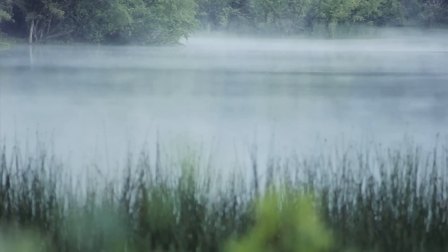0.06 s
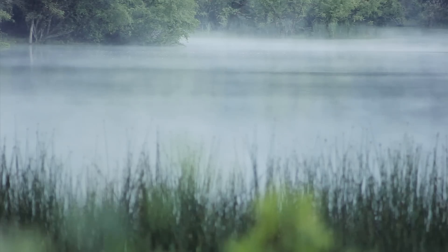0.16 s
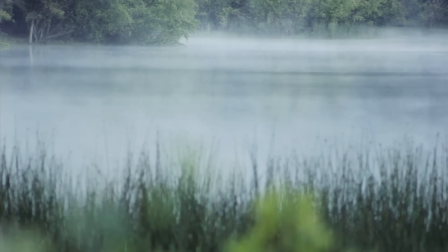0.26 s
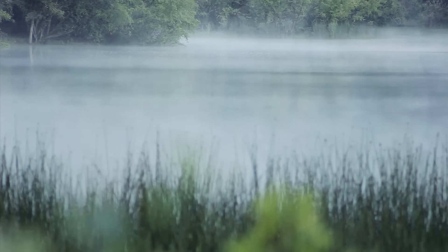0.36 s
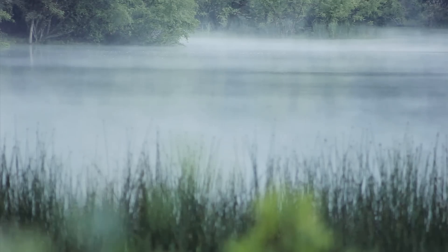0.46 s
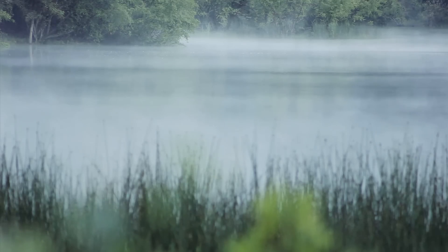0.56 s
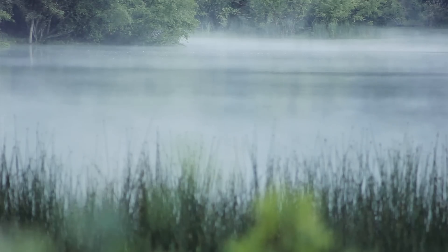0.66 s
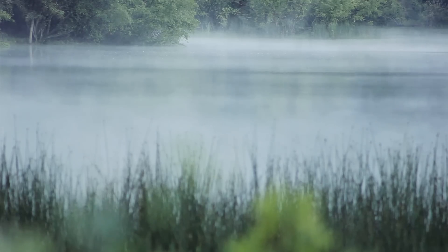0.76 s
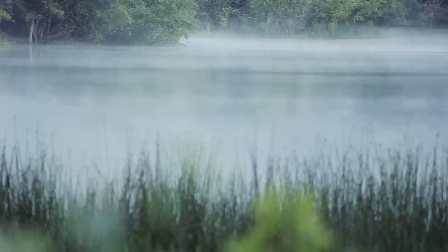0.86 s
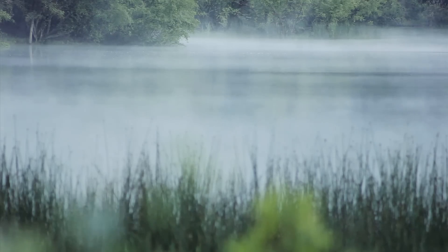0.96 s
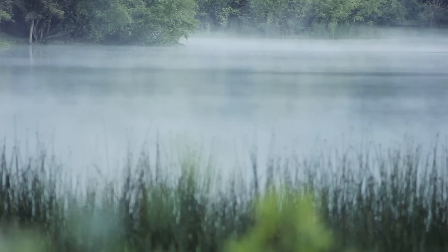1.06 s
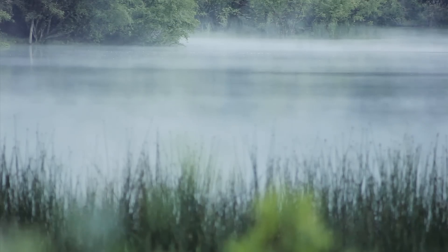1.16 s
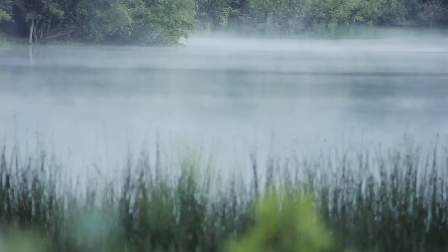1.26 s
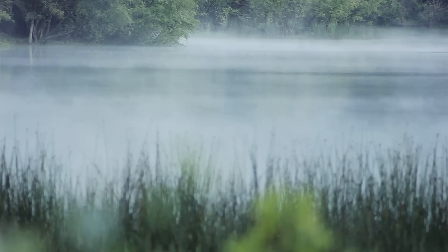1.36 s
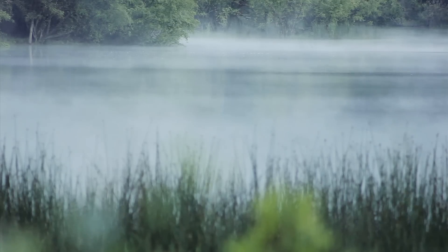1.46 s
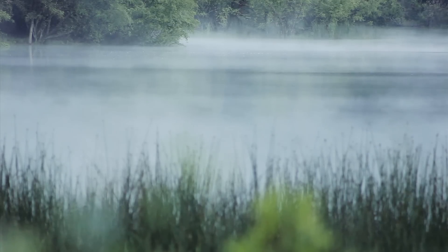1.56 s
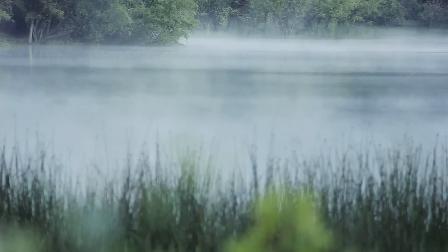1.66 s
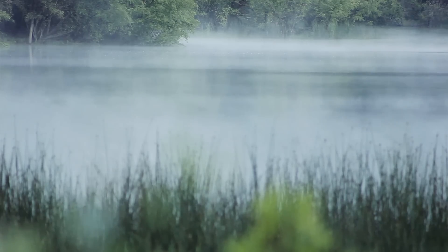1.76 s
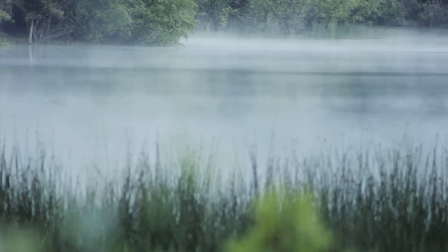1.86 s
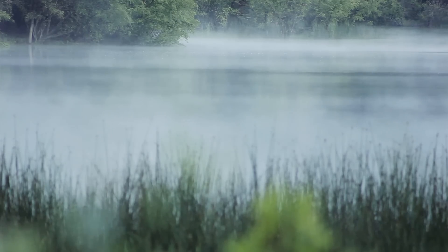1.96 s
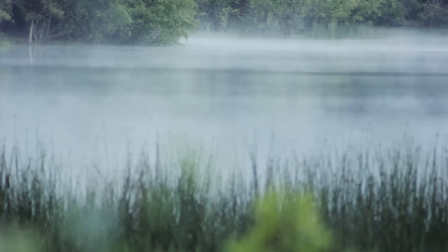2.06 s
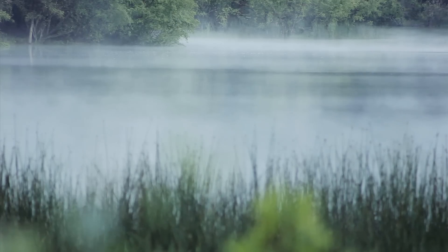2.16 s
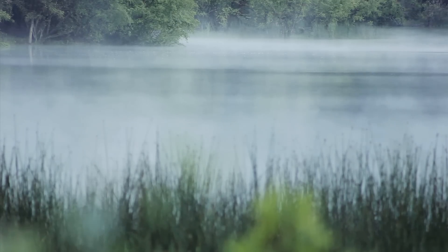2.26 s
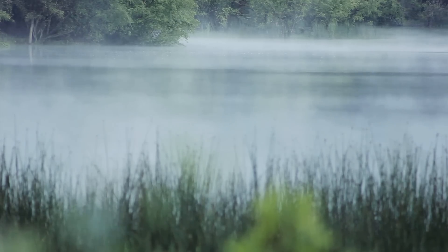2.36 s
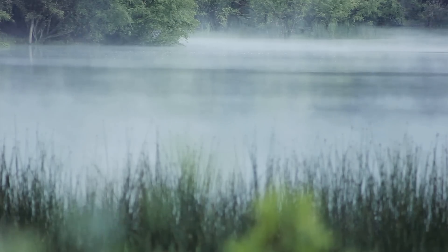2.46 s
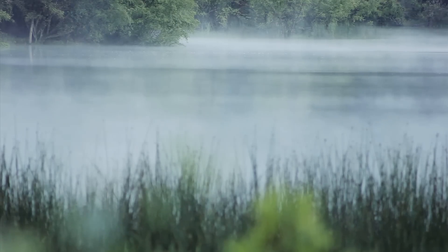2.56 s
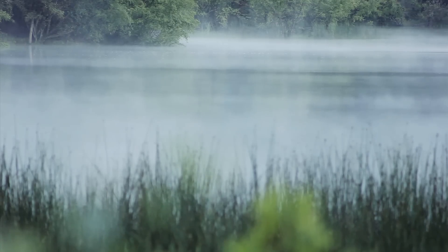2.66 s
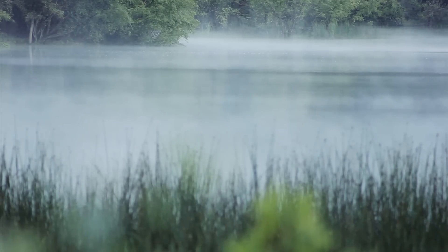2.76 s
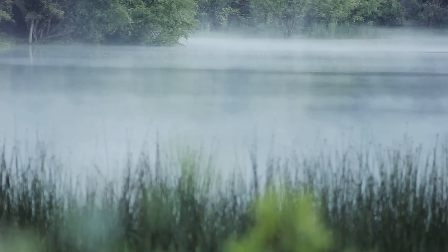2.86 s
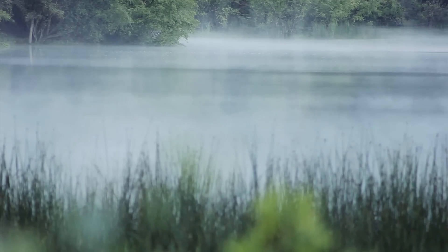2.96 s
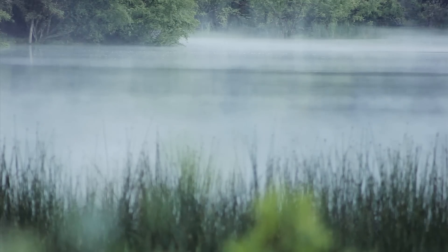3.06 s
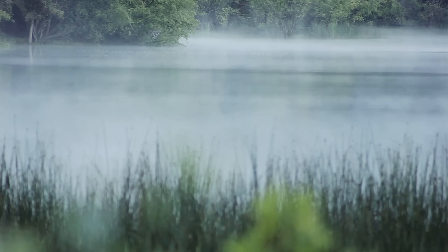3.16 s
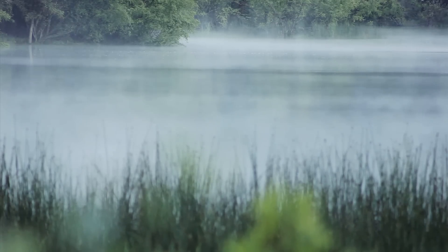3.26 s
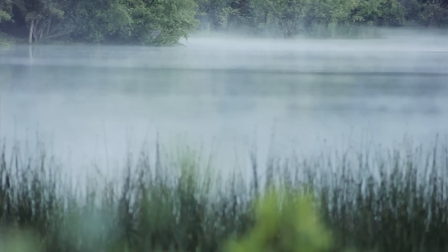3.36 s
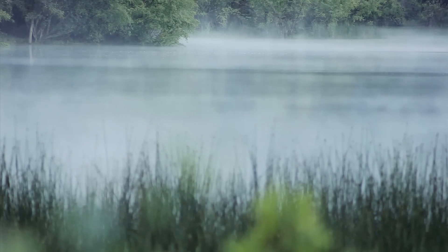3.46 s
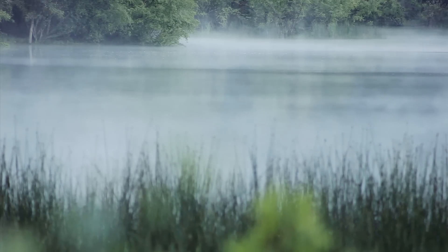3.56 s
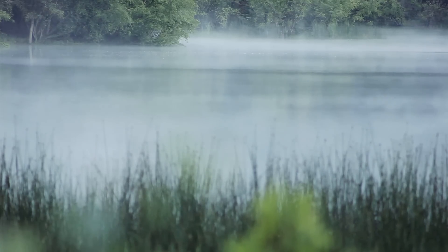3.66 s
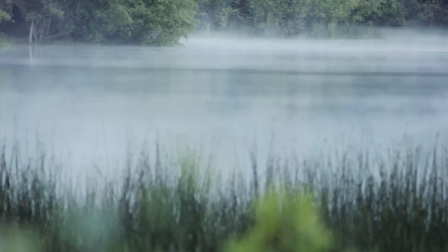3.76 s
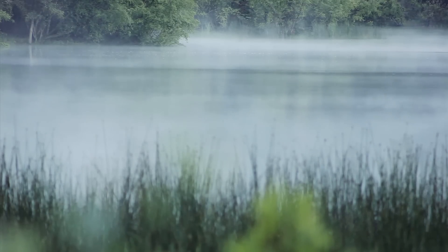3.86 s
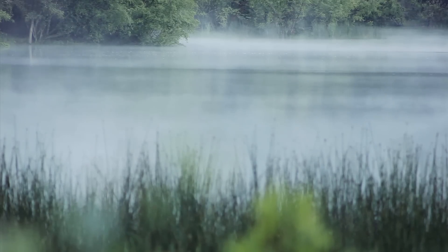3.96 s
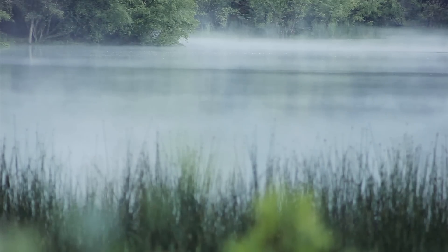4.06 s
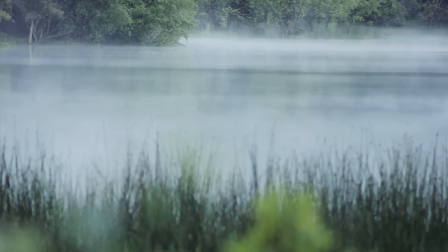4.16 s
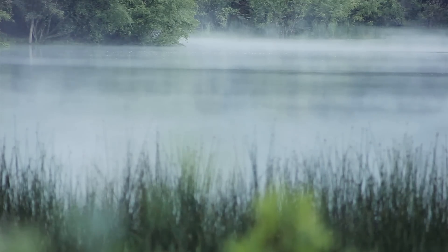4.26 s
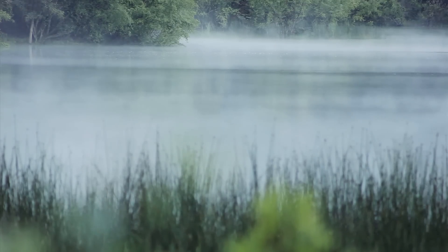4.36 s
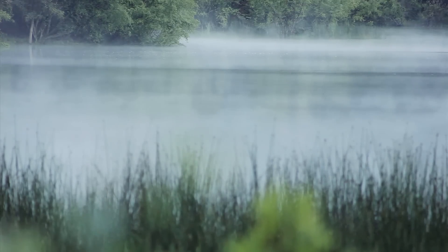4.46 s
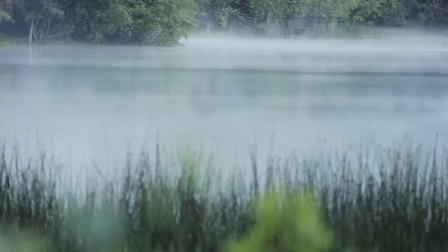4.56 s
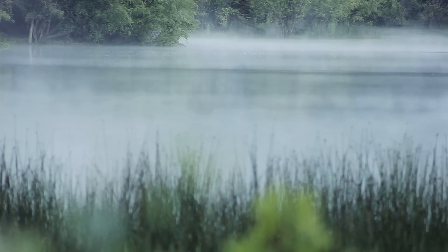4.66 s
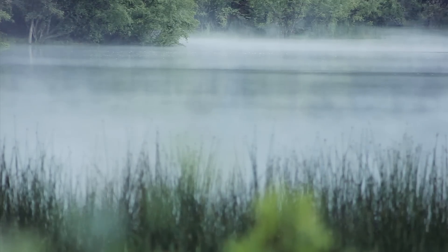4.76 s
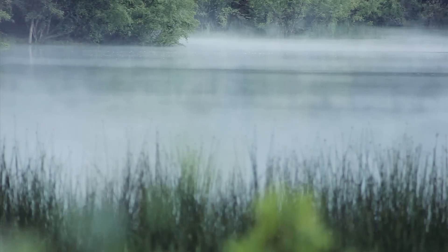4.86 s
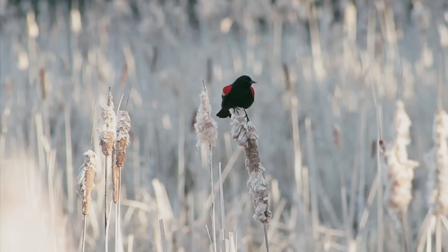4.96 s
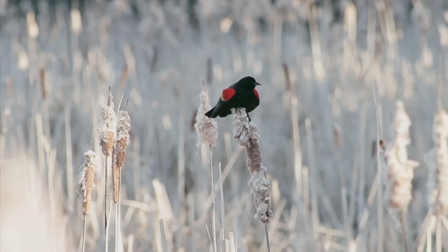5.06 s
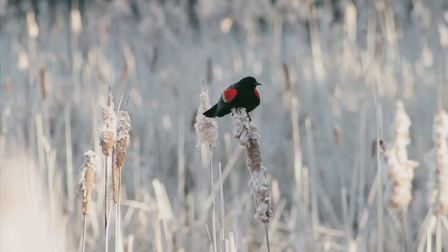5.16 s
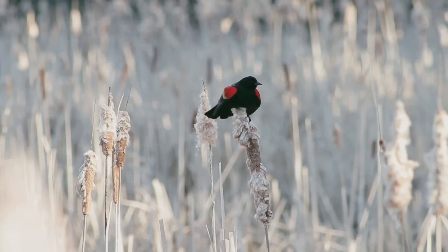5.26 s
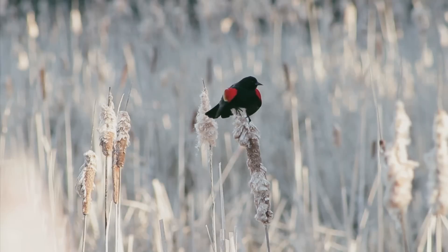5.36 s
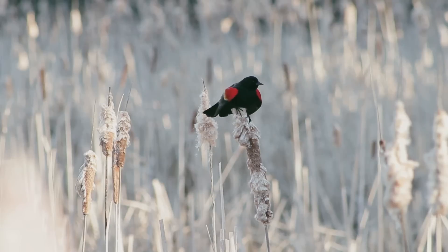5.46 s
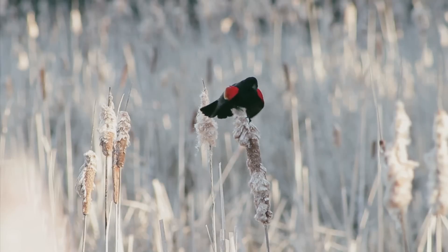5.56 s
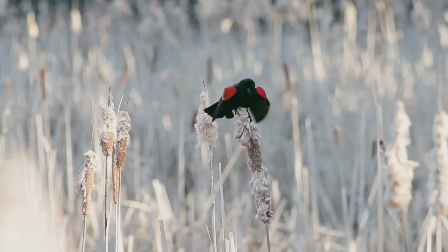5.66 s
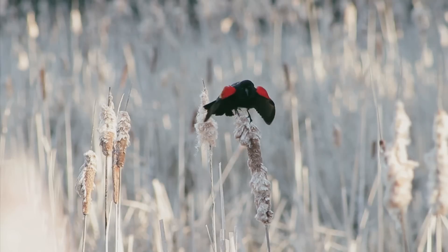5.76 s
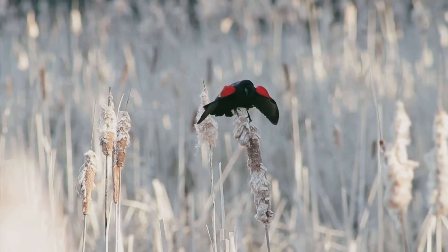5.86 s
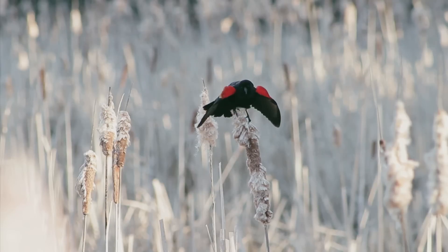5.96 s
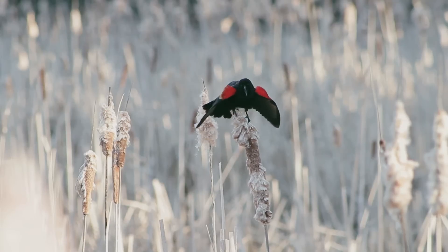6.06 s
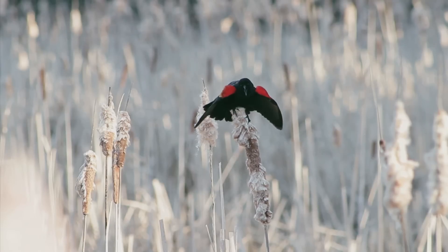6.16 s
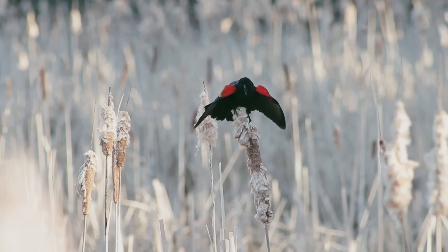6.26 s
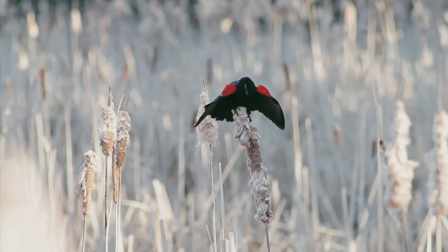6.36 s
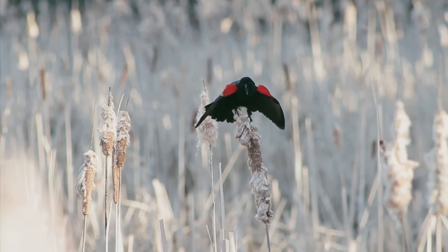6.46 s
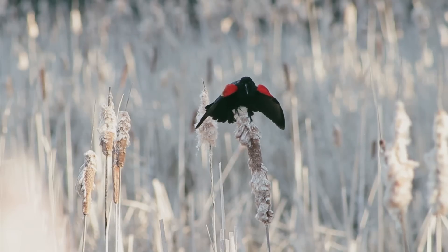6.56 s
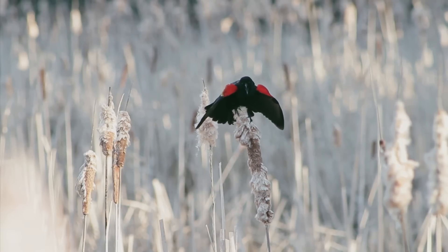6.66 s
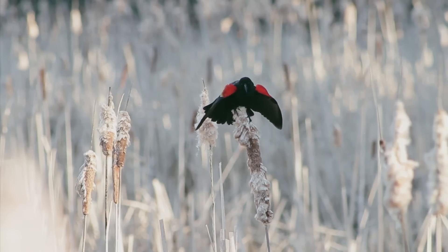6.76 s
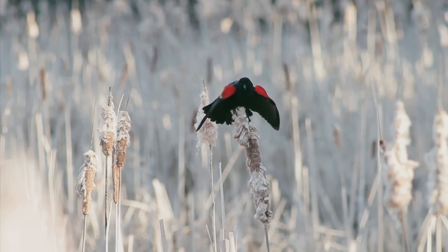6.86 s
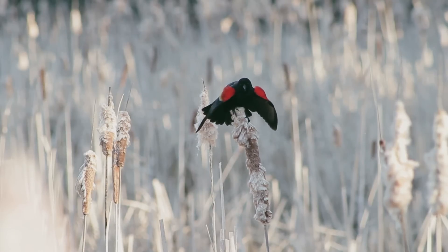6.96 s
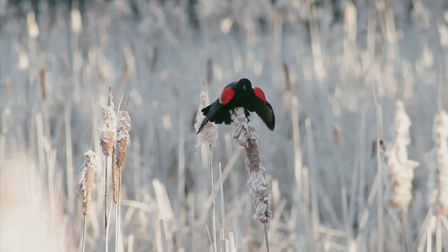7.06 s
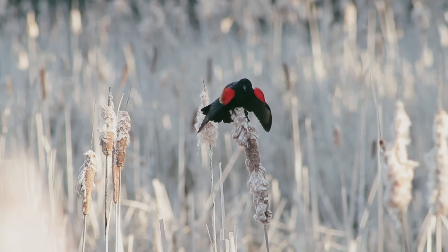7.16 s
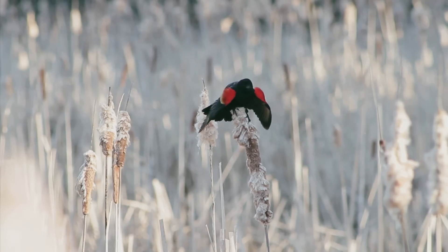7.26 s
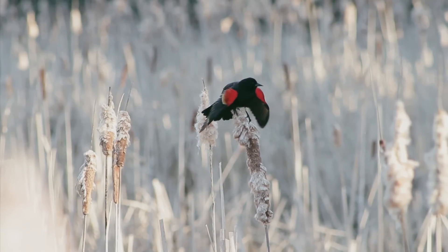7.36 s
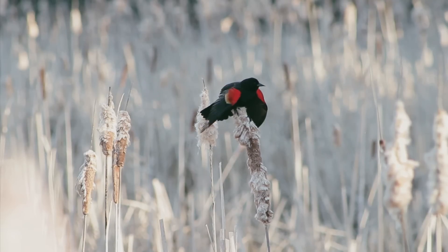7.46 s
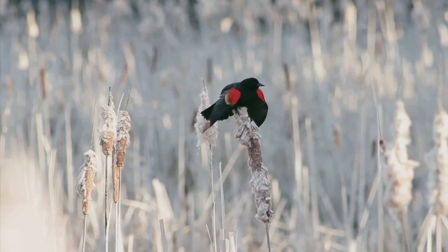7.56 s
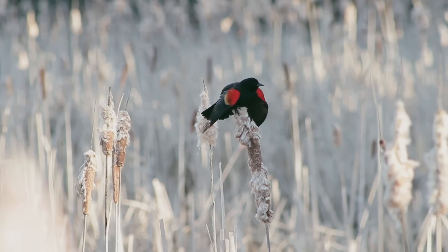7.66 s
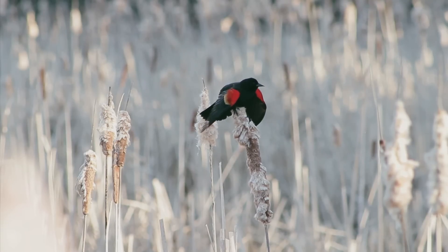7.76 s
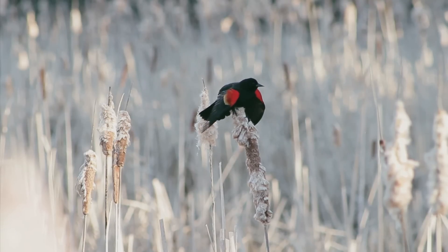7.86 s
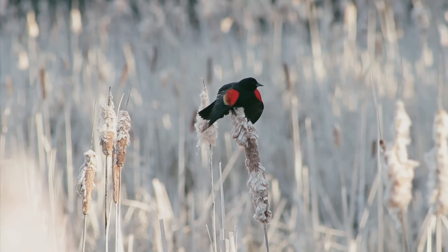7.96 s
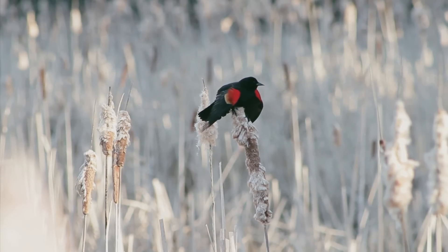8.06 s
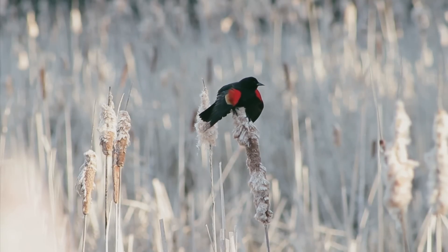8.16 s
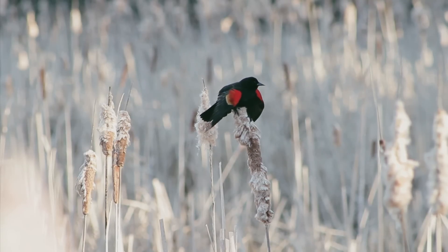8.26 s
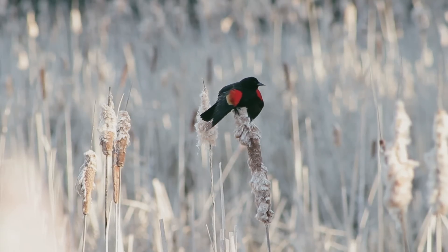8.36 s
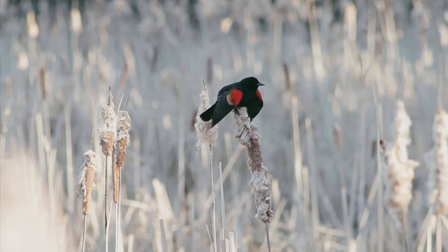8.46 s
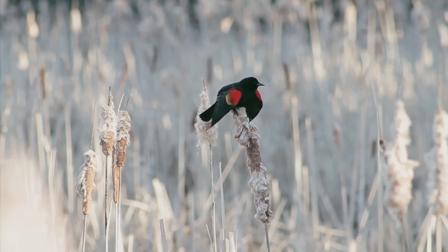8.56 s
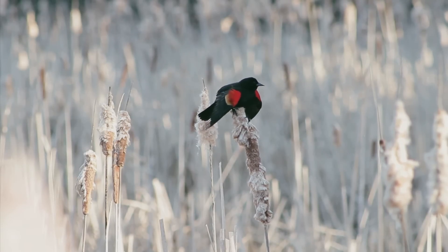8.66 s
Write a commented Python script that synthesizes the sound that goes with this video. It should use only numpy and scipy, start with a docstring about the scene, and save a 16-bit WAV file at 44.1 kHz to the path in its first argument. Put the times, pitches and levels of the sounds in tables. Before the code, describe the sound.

Quiet reed marsh beside a lake, single microphone with the main blackbird fairly close and other birds farther off. A brief bright trill and mellow gurgles give way to ticks, far peeps, a softer trill and a long grating buzz. The middle is sparse, with hush, tiny snaps and thin whistles. Then a harsh check, liquid notes, a throbbing trill and sharp descending chirps, ending with hoarse far crow caws.

```python
"""A fast two-voiced red-wing trill opens over a soft hush of air and water, then liquid notes and two chirps.
Another blackbird ticks, far birds whistle, a softer trill answers and a rasping pulsed buzz draws out.
Checks and reed snaps are shaped noise; late on come a throbbing slow trill and a run of swept chirps.
A crow caws twice and starts again at the end. Reeds and shore echo the calls as sparse random scatter."""
import sys
import numpy as np
from scipy import signal
from scipy.fft import rfft, irfft, next_fast_len
from scipy.io import wavfile
from scipy.ndimage import uniform_filter1d

SR = 44100
rng = np.random.default_rng(int(sys.argv[2]) if len(sys.argv) > 2 else 0)


def generate_wav(sig):
    """Save sig (samples, or channels by samples) to the path in sys.argv[1] as 16-bit PCM at SR."""
    pcm = np.round(np.clip(np.atleast_2d(sig).T, -1, 1) * 32767).astype(np.int16)
    wavfile.write(sys.argv[1], SR, pcm)


N = 383669


def amp(db):
    """Decibels to gain."""
    return 10 ** (np.asarray(db) / 20)


def evened(x):
    """Scales to rms 1."""
    return x / np.sqrt(np.mean(x ** 2) + 1e-20)


def read(points, hz):
    """Reads a spectrum on a log-frequency axis."""
    f, value = np.transpose(points)
    return np.interp(np.log(hz + 1), np.log(f + 1), value)


def course(rows):
    """A table of curves at audio rate: time first, then each column."""
    s, *columns = np.transpose(rows)
    t = np.arange(s[0], s[-1], 1 / SR)
    return [t] + [np.interp(t, s, c) for c in columns]


def add(mix, s, sound):
    """Mixes a sound in at time s."""
    part = mix[max(round(s * SR), 0):][:len(sound)]
    part += sound[:len(part)]


def played(sounds):
    """Lays (start s, sound) pairs on one track."""
    mix = np.zeros(N)
    for s, sound in sounds:
        add(mix, s, sound)
    return mix


def colour(x, gain):
    """Filters by a gain given as a function of frequency."""
    size = next_fast_len(len(x) + 1024)
    spectrum = rfft(x, size) * gain(np.fft.rfftfreq(size, 1 / SR))
    return irfft(spectrum, size)[:len(x)]


def wander(t, hz):
    """Smooth noise of rms 1, rolled off around hz."""
    return evened(colour(rng.standard_normal(len(t)), lambda f: np.exp(-(f / hz) ** 2)))


def angle(hz):
    """Running phase of a frequency curve, in radians."""
    return 2 * np.pi * np.cumsum(hz) / SR


def envelope(t, attack_s, release_s):
    """Rises, holds and falls to silence at the end of t."""
    return np.clip(t / attack_s, 0, 1) * np.clip((t[-1] - t) / release_s, 0, 1)


# Hush spectrum. Each row: frequency in Hz, relative level in dB.
HUSH_SPECTRUM = [(15, -44), (25, -14), (82, -7.5), (165, -12), (260, -5.5), (400, -2), (583, -4),
                 (1050, -2), (1170, 0), (1800, -3.5), (2240, -3), (2850, -2.5), (3730, -8), (4880, -7),
                 (5590, -11), (15500, -16.5)]
# Level changes of the hush: swells, and a brief overall dip near 5 s. Each row: centre in s, half width in s,
# then changes in dB: overall, lapping water, low wind.
HUSH_LEVEL_CHANGES = [(1.8, 1.5, 1, 2, 0), (4.35, .45, 0, 5, 0), (4.98, .2, -3.5, 0, 1),
                      (7, .18, 0, 1, 10.5)]
HUSH_DB, WATER_DB, WIND_DB = -47.8, -.8, 10.2  # before the level changes


def hush(patchy_db=0.9):
    """Soft noise with drifting patches; water swells its low middle and wind its bass."""
    hz, t, z = signal.stft(rng.standard_normal(N), SR, nperseg=1024, noverlap=768)
    changes_db = sum(np.outer(heights_db, np.exp(-((t - s) / width_s) ** 2))
                     for s, width_s, *heights_db in HUSH_LEVEL_CHANGES)
    db, water_db, wind_db = changes_db + np.array([HUSH_DB, WATER_DB, WIND_DB])[:, None]
    patches = uniform_filter1d(rng.standard_normal(z.shape), size=14, axis=0)
    patches = evened(uniform_filter1d(patches, size=14, axis=1))
    f = hz[:, None]
    water_field_db = water_db * np.exp(-np.log((f + 1) / 460) ** 2)
    wind_field_db = wind_db / (1 + (f / 190) ** 4)
    field_db = db + patchy_db * patches + water_field_db + wind_field_db
    shaped = z * evened(amp(read(HUSH_SPECTRUM, f))) * amp(field_db)
    return signal.istft(shaped, SR, nperseg=1024, noverlap=768)[1][:N]


# The red-wing's throat. Each row: frequency in Hz, gain in dB.
TRILL_THROAT = [(900, -25), (1500, -4), (1720, -15), (2000, -8.5), (2200, -14.5), (2500, 1), (5250, -2),
                (5700, -6.5), (6400, -18), (9000, -35)]
# cycles slow steadily and drag more around the moment they falter
TRILL_SAG_HZ_PER_S, FALTER_HZ, FALTER_HALF_WIDTH_S = 2.4, 3.3, .073


def trill(row, cycle, overtones, start, flutter_hz, low_flutter, high_flutter, overtone_db,
          shake=0.013, fade_db=1):
    """The two sides of the syrinx repeat a pitch figure; a fast flutter spreads each into sidebands."""
    s, length_s, attack_s, release_s, db, cycles_hz, falter_s = row
    t = np.arange(0, length_s, 1 / SR)
    falter = np.exp(-((s + t - falter_s) / FALTER_HALF_WIDTH_S) ** 2)
    rate_hz = cycles_hz - TRILL_SAG_HZ_PER_S * t - FALTER_HZ * falter
    turn = angle(rate_hz) / (2 * np.pi) + start
    share, *columns = np.transpose(cycle)
    low_hz, low_db, high_hz, high_db = (np.interp(turn, share, c, period=1) for c in columns)
    # the flutter starts afresh in every cycle and grows with the low voice
    flutter_phase = 2 * np.pi * flutter_hz * (turn % 1) / rate_hz.mean() + .9 * wander(t, 150)
    flutter = amp(low_db) * np.sin(flutter_phase)
    low_phase = angle(low_hz * (1 + .007 * wander(t, 200))) + low_flutter * flutter
    high_shake = shake * amp(low_db) * wander(t, 494)
    high_phase = angle(high_hz * (1 + high_shake)) + high_flutter * flutter

    def side(phase, level_db, orders):
        """Harmonics of one side of the syrinx, equally strong."""
        return amp(level_db) * sum(np.sin(k * phase) for k in orders)

    voice = side(low_phase, low_db, [1]) + side(high_phase, high_db, [1])
    edge = side(low_phase, low_db, range(2, 6)) + side(high_phase, high_db, range(2, 4))
    voice = evened(colour(voice, lambda f: amp(read(TRILL_THROAT, f))))
    edge = evened(colour(edge, lambda f: amp(read(overtones, f))))
    level = amp(db + fade_db * (.5 - t / length_s)) * envelope(t, attack_s, release_s)
    return s, level * (voice + amp(overtone_db) * edge)


# Each row: share of the cycle, low voice in Hz, its level in dB, high voice in Hz, its level in dB.
FAST_CYCLE = [(0, 2800, -4, 5335, 3.5), (.1, 2800, -6.5, 4160, 5), (.2, 3000, -1, 3020, -13),
              (.4, 2877, 2, 3793, -3), (.6, 2776, 3, 4305, -17), (.8, 2725, -7, 5164, 5),
              (.9, 2770, -0.5, 5540, -12)]
THROB_CYCLE = [(0, 2943, -22, 6000, -24), (.2, 2993, 4.5, 6300, -11), (.5, 3090, 1, 6400, -17),
               (.8, 3067, 0, 6100, -19)]
SLOW_CYCLE = [(0, 2917, -19, 5115, 9), (.06, 2896, -13.5, 5104, -11), (.16, 2934, 6, 4293, -10.5),
              (0.399, 2828, 0.5, 4342, -0.5), (.6, 2820, 1, 3900, 6), (.8, 2763, 5.5, 4000, 0),
              (.93, 2861, -11.5, 4976, 3)]
# One row each: start in s, length in s, attack in s, release in s, level in dB, cycles per s, falter time in s.
FAST_TRILL = (0, .24, .002, .028, -16.9, 93.2, .22)
THROB = (6.17, .064, .008, .008, -14.6, 141.5, 6.19)
SLOW_TRILL = (6.225, .68, .004, .03, -21, 32.1, 6.64)
# What the throat passes of the overtones. Each row: frequency in Hz, gain in dB.
TRILL_OVERTONES = [(5500, 6), (6800, 10), (8200, -6), (9500, -15), (10800, -5), (11900, 10), (13800, -13),
                   (15500, 3)]
THROB_OVERTONES = [(5000, 0), (6300, 1), (7200, 2), (9300, -8), (13000, -8), (15500, -10)]
SLOW_OVERTONES = [(5500, 0), (6800, -3), (8200, -11), (9500, -2), (11300, 5), (13500, -3), (15300, 7)]
# Bright, hoarse edge on the notes leading into the last trill. Each row: start in s, length in s,
# first, middle and last pitch in Hz, level in dB, roughness 0-1.
RASPS = [(6.064, 0.058, 5600, 5750, 5700, -39, .6), (6.138, 0.092, 6070, 6410, 5640, -33.5, 0.6),
         (6.146, .11, 12000, 12950, 13600, -39.5, .8)]


def trills():
    """The two near red-wing trills; the last opens with a loud throb."""
    fast = trill(FAST_TRILL, FAST_CYCLE, TRILL_OVERTONES, start=0.13, fade_db=3, flutter_hz=690,
                 low_flutter=0.18, high_flutter=0.29, overtone_db=-26)
    throb = trill(THROB, THROB_CYCLE, THROB_OVERTONES, start=0.78, fade_db=4, flutter_hz=595,
                  low_flutter=0.092, high_flutter=2.7, overtone_db=-23)
    slow = trill(SLOW_TRILL, SLOW_CYCLE, SLOW_OVERTONES, start=0.12, flutter_hz=786.5,
                 low_flutter=0.55, high_flutter=1.18, overtone_db=-30, shake=.05)
    return played([fast, throb, slow] + [whistle(*row) for row in RASPS])


# Liquid notes. Each row: start in s, length in s, attack in s, pitch in Hz, glide in Hz,
# harmonic that the throat picks, level in dB.
NOTES = [(.23, .04, .009, 2425, -210, 1, -21.5), (.255, .14, .034, 1448, -105, 1, -31),
         (.275, .13, .03, 1200, -200, 1, -37.5), (.39, .035, .013, 880, -47, 1, -42),
         (.445, .15, .03, 846, -17, 2, -34.5), (.63, .089, .063, 860, 19, 1, -29),
         (1.23, .05, .026, 1080, -34, 1, -42), (1.368, .11, .008, 1970, 130, 1, -31.5),
         (1.452, .038, .009, 2345, 130, 1, -39), (1.5, .021, .009, 2440, 120, 1, -27),
         (1.505, .23, .078, 289, -10, 3.7, -37.5), (1.715, .15, .04, 396, 34, 3.4, -36.5),
         (2.27, .16, .03, 1488, 0, 1, -37), (5.79, .18, .034, 1884, -32, 1, -42),
         (5.838, .057, .005, 1436, 44, 1, -21.5), (5.91, .13, .11, 899, 48, 1, -45),
         (6.04, .1, .016, 1898, 105, 1, -26), (6.135, .017, .003, 1388, 104, 1, -23),
         (6.14, .12, .017, 1468, 31, 1, -26.5), (6.9, .11, .028, 1464, -72, 1, -24.5)]
NOTE_FADE_DB = 20


def note(s, length_s, attack_s, pitch_hz, glide_hz, harmonic, db, width_hz=190, jitter=0.014):
    """A harmonic tone of which the throat picks one or two partials; it swells and dies away."""
    t = np.arange(0, length_s, 1 / SR)
    hz = (pitch_hz + glide_hz * (t / length_s - .5)) * (1 + jitter * wander(t, 150))
    k = np.arange(1, int(9000 / pitch_hz) + 1)[:, None]
    resonance = 1 / (1 + ((k - harmonic) * pitch_hz / width_hz) ** 2)
    leak = amp(-26.5) * (k * pitch_hz > 800) / np.sqrt(k)
    tone = evened(((resonance + leak) * np.sin(k * angle(hz))).sum(0))
    off_peak = np.interp(t, [0, attack_s, length_s], [1, 0, 1])
    return s, amp(db - NOTE_FADE_DB * off_peak ** 1.67) * tone * signal.windows.tukey(len(t), .08)


# Sharp chirps. Each row: start in s, held pitch in Hz, level in dB.
CHIRPS = [(0.243, 4400, -28.5), (0.338, 4520, -27.5), (6.772, 4350, -24), (6.862, 4260, -16),
          (6.951, 4260, -15.5), (7.045, 4203, -19), (7.144, 4130, -21), (7.254, 4070, -20.5),
          (7.379, 3910, -28.5), (7.478, 3900, -26), (7.625, 3950, -29.5)]
CHIRP_S, CHIRP_ATTACK_S, HOOK_S, HOOK_SHARE = .054, .016, .006, .12
PLUNGE_S, PLUNGE_SHARE, PLUNGE_DB, CHIRP_OVERTONE_DB = .016, .52, -21, -28


def chirp(s, hz, db, jitter=.012):
    """A whistle that hooks up to its pitch, holds it, then plunges and fades."""
    t = np.arange(0, CHIRP_S, 1 / SR)
    plunge = np.clip(1 - (CHIRP_S - t) / PLUNGE_S, 0, 1) ** 2
    bend = 1 - HOOK_SHARE * np.exp(-t / HOOK_S) - PLUNGE_SHARE * plunge
    phase = angle(hz * bend * (1 + jitter * wander(t, 340)))
    overtones = amp(CHIRP_OVERTONE_DB) * (np.sin(2 * phase) + amp(-3.5) * np.sin(3 * phase))
    tone = envelope(t, CHIRP_ATTACK_S, .001) * np.sin(phase) + overtones
    return s, np.sqrt(2) * amp(db + PLUNGE_DB * plunge) * tone


# Each row: start in s, level in dB.
TICKS = [(0.839, -37.5), (0.968, -35), (1.102, -34.5), (1.224, -37), (4.013, -52)]
# Sweep of one tick. Each row: time after its start in s, pitch in Hz, relative level in dB.
TICK_SHAPE = [(0, 6220, -20), (.005, 4810, 0.5), (.01, 3098, -8), (.017, 1800, -1), (.032, 1320, -12)]


def tick(s, db):
    """A rough, very fast downward sweep."""
    t, hz, level_db = course(TICK_SHAPE)
    return s, amp(db + level_db) * np.sin(angle(hz * (1 + .15 * wander(t, 880))))


# Far whistles. Each row: start in s, length in s, first, middle and last pitch in Hz,
# level in dB before the far trim, roughness 0-1.
FAR_WHISTLES = [(1.386, 0.021, 5800, 5860, 5700, -46.5, 0.05), (1.412, 0.031, 5250, 5130, 5050, -45, 0.18),
                (4.802, 0.7, 2700, 2870, 2984, -52.5, 0.6), (5.171, 0.073, 2900, 3060, 3010, -41.5, 0.2),
                (5.26, 0.082, 2700, 2220, 2180, -46.5, 0.2), (5.378, .1, 3000, 2620, 2400, -47, 0.06),
                (5.356, .078, 5600, 5950, 6150, -56, .07), (5.425, .3, 4200, 4600, 4500, -52, .83),
                (5.754, .02, 4100, 5000, 4200, -44, .5), (5.846, .02, 3000, 3900, 3300, -47, .2),
                (5.887, .022, 4100, 5100, 4900, -45, .5), (5.953, .022, 3300, 4100, 4200, -47, .3),
                (7.023, 0.14, 2560, 2620, 2540, -49, 0), (7.23, 0.11, 2750, 3050, 3010, -48.5, .05),
                (7.35, .09, 2650, 2200, 2200, -49, 0.07), (7.464, 0.1, 2950, 2480, 2380, -46.5, 0.16)]


def whistle(s, length_s, first_hz, middle_hz, last_hz, db, rough):
    """A curved glide, hoarse when its pitch shakes."""
    u = np.linspace(0, 1, int(length_s * SR))
    hz = np.polyval(np.polyfit([0, .5, 1], [first_hz, middle_hz, last_hz], 2), u)
    tone = np.sin(angle(hz * (1 + 0.0866 * rough * wander(u, 555))))
    return s, amp(db) * evened(tone * signal.windows.tukey(len(u), .5))


# Each row: share of the cycle, low voice in Hz, its level in dB, high voice in Hz, its level in dB.
MID_CYCLE = [(0, 2710, -9, 5170, 2), (.12, 2900, -12, 4950, 1), (.25, 2930, -5, 4150, -2),
             (.45, 2850, 2.5, 4000, -3), (.65, 2770, 4, 3600, -1), (.8, 2720, 1, 3650, -7),
             (.9, 2700, -8, 5250, -1)]
# One row: start in s, length in s, attack in s, release in s, level in dB before the trim,
# cycles per s, falter time in s.
MID_TRILL = (1.525, .76, .03, .1, -31.5, 38.3, 1.82)


def neighbour_trill():
    """A softer red-wing trill from the same two-voiced syrinx."""
    sound = trill(MID_TRILL, MID_CYCLE, TRILL_OVERTONES, start=0.97, fade_db=-1.2, flutter_hz=425,
                  low_flutter=0.85, high_flutter=1.27, overtone_db=-48, shake=0.023)
    return amp(-1.5) * played([sound])


# Throat of the buzzing bird. Each row: frequency in Hz, gain in dB.
BUZZ_THROAT = [(600, -33), (900, -17), (1150, -3.5), (1330, -5.5), (1600, 3), (1800, 2.5), (2480, -14),
               (2740, -0.5), (2960, -9), (3700, -6), (4050, -11), (4950, -11), (5650, -19), (6800, -18),
               (8000, -32), (9800, -37), (12000, -60)]
# the buzz swells, holds and lets go; loudness and pulse rate both follow the effort
BUZZ_START_S, BUZZ_LENGTH_S, BUZZ_SWELL_S, BUZZ_RELEASE_S = 1.85, 1.6, .62, .3
BUZZ_DB, BUZZ_SWELL_DB, BUZZ_RELEASE_DB = -33.6, 16, 14.5
BUZZ_HZ, BUZZ_SWELL_HZ, BUZZ_SAG_HZ_PER_S, BUZZ_RELEASE_HZ = 69.9, 8.6, 2.3, 10  # pulse pairs per s
# near its end the beak closes, lowering the throat resonances and dulling the treble
BEAK_CLOSES_S, BEAK_CLOSING_S, BEAK_DROP_SHARE, BEAK_TREBLE_DB = 3.252, .03, .3, -20


def buzz(lag=.44, second=0.66, sweep=0.38, rasp_hz=3000, air_db=-11.5):
    """Unevenly paired pulses, each a small upward sweep in the throat, with a light rasp on top."""
    t = np.arange(0, BUZZ_LENGTH_S, 1 / SR)
    slack = np.clip(1 - t / BUZZ_SWELL_S, 0, 1)
    release = np.clip(1 - (BUZZ_LENGTH_S - t) / BUZZ_RELEASE_S, 0, 1)
    shut = .5 + .5 * np.tanh((BUZZ_START_S + t - BEAK_CLOSES_S) / BEAK_CLOSING_S)
    db = BUZZ_DB - BUZZ_SWELL_DB * slack - BUZZ_RELEASE_DB * release ** 1.5
    sag_hz = BUZZ_SAG_HZ_PER_S * np.maximum(t - BUZZ_SWELL_S, 0)
    hz = BUZZ_HZ - BUZZ_SWELL_HZ * slack - sag_hz - BUZZ_RELEASE_HZ * release
    beak = 1 - BEAK_DROP_SHARE * shut
    treble_db = BEAK_TREBLE_DB * shut
    phase = angle(hz * (1 + .002 * wander(t, 90)))

    def upper(f):
        """Share of the treble, 0 below and 1 above rasp_hz."""
        return 1 - 1 / (1 + (f / rasp_hz) ** 8)

    pulses, delay = np.zeros(len(t)), 0
    for k in range(8, 130):
        # higher partials leave later in each pulse
        delay += sweep * 2 * np.pi * np.clip((k - 12) / 20, 0, 1)
        pair = 1 + second * np.exp(-2j * np.pi * lag * k)
        partial_hz = k * hz[::64]
        treble = upper(partial_hz)
        throat_hz = partial_hz / beak[::64] ** (1 - treble)
        gain = amp(read(BUZZ_THROAT, throat_hz) + treble_db[::64] * treble)
        partial = np.cos(k * phase - delay + np.angle(pair))
        pulses += abs(pair) * np.interp(t, t[::64], gain) * partial
    pulsed_noise = rng.standard_normal(len(t)) * (1 + .7 * np.cos(2 * phase))
    air = colour(pulsed_noise, lambda f: amp(read(BUZZ_THROAT, f)) * upper(f))
    return BUZZ_START_S, amp(db) * (evened(pulses) + amp(air_db + treble_db) * evened(air))


# Harsh checks. Each row: start in s, length in s, level in dB, resonance centre in Hz, its width in Hz.
CHECKS = [(2.158, 0.032, -27, 2600, 515), (3.635, 0.024, -43.5, 2930, 354), (5.655, .04, -20.5, 3810, 1670),
          (6.391, 0.039, -20, 3750, 1700)]
# Each row: frequency in Hz, gain in dB.
CHECK_COLOUR = [(350, -75), (600, -42), (1030, -21), (1200, -32), (1430, -14.5), (2220, -26.5), (3520, -21),
                (3870, -25), (4810, -22), (6060, -30.5), (11200, -40), (13500, -37), (15500, -45)]


def check(s, length_s, db, centre_hz, width_hz):
    """A short toneless call: noise through one broad throat resonance."""
    def throat(f):
        """Resonance over a weak floor, coloured."""
        resonance = 1 / (1 + ((f - centre_hz) / width_hz * 2) ** 2)
        return amp(read(CHECK_COLOUR, f)) * (0.1 + resonance)

    rasp = evened(colour(rng.standard_normal(int(length_s * SR)), throat))
    return s, amp(db) * rasp * signal.windows.tukey(len(rasp), .8)


# Repeated far calls. One row each: first start in s, first gap in s, growth of the gap in s, call length in s,
# pitch in Hz, rise in Hz, level in dB before the far trim, roughness 0-1.
PEEPS = (2.2, .085, .009, .055, 4430, 120, -40.5, .35)
WHEEZES = (3.355, .478, -.044, .08, 4640, 20, -52, .85)


def repeated(row, count):
    """One far call over and over, the gaps changing evenly."""
    first_s, gap_s, growth_s, length_s, hz, rise_hz, db, rough = row
    starts_s = [first_s + k * gap_s + growth_s * k * (k - 1) / 2 for k in range(count)]
    return [whistle(s, length_s, hz - rise_hz, hz, hz + rise_hz / 2, db, rough) for s in starts_s]


# Dry snaps in the reeds. Each row: start in s, level in dB.
SNAPS = [(4.08, -43), (4.249, -37), (4.75, -41.5), (8.398, -39)]


def snap(s, db, decay_s=0.0054):
    """A dry stalk cracks: dulled noise that dies away exponentially."""
    t = np.arange(0, .03, 1 / SR)
    noise = evened(colour(rng.standard_normal(len(t)), lambda f: 1 / np.hypot(1, f / 5000)))
    return s, amp(db) * np.exp(-t / decay_s) * noise


# Each row: start in s, level in dB before the fade and the crow trim.
CAWS = [(7.963, -31), (8.385, -30.3), (8.675, -35.5)]
# Each row: frequency in Hz, gain in dB.
CROW_THROAT = [(300, -43), (430, -26), (540, -9.5), (800, -18), (1100, -7.5), (1380, 4), (2050, -6),
               (2700, -29), (3400, -10.5), (3900, -23), (4700, -20), (5800, -34), (9000, -44)]
CAW_S, CAW_ATTACK_S, CAW_RELEASE_S, CAW_FADE_DB_PER_S = .25, .04, .03, -26
CAW_LOW_HZ, CAW_TOP_HZ, CAW_SKEW = 400, 538, .58


def caw(s, db, rattle_hz=85, rattle=0.65):
    """A hoarse, lopsided arch of pitch, rattled in loudness, through the crow's throat."""
    t = np.arange(0, CAW_S, 1 / SR)
    arch = np.sin(np.pi * (t / CAW_S) ** CAW_SKEW) ** 2
    hz = CAW_LOW_HZ + (CAW_TOP_HZ - CAW_LOW_HZ) * arch
    phase = angle(hz * (1 + .03 * wander(t, 400)))
    voice = sum(amp(read(CROW_THROAT, k * hz)) * np.cos(k * phase) for k in range(1, 15))
    shake = 1 + rattle * np.sin(angle(rattle_hz * (1 + 0.28 * wander(t, 87))))
    level = amp(db + CAW_FADE_DB_PER_S * t) * envelope(t, CAW_ATTACK_S, CAW_RELEASE_S)
    return s, level * evened(voice * shake)


# Decay of the shore echo. Each row: frequency in Hz, time to fall 60 dB in s.
SHORE_T60 = [(300, 0.96), (1500, 0.9), (4000, 0.96), (12000, 0.15)]


def outdoors(x, reeds_db, shore_db, reeds_t60_s=0.16):
    """Early scatter from the reeds and a longer, duller tail from the shore."""
    t = np.arange(SR) / SR
    sparse = rng.random((2, SR)) < 2500 / SR  # about 2500 echoes per s
    early, late = rng.standard_normal((2, SR)) * sparse * (t > .006)
    early = early * amp(-60 * t / reeds_t60_s)
    hz, age_s, z = signal.stft(late, SR, nperseg=256)
    decay = amp(-60 * age_s / read(SHORE_T60, hz)[:, None])
    late = signal.istft(z * decay, SR, nperseg=256)[1][:SR]
    reeds = amp(reeds_db) * early / np.linalg.norm(early)
    shore = amp(shore_db) * late / np.linalg.norm(late)
    return x + signal.oaconvolve(x, reeds + shore)[:N]


def scene():
    """Sums the hush and the calls, each group with its own balance of reed and shore echo."""
    songs = outdoors(trills(), reeds_db=-8.5, shore_db=-23)
    neighbour = outdoors(neighbour_trill(), reeds_db=-4, shore_db=-12)
    notes = outdoors(played([note(*row) for row in NOTES]), reeds_db=-11.5, shore_db=-20.5)
    chirps = outdoors(played([chirp(*row) for row in CHIRPS]), reeds_db=-7, shore_db=-21.5)
    ticks = [tick(*row) for row in TICKS]
    checks = [check(*row) for row in CHECKS]
    snaps = [snap(*row) for row in SNAPS]
    clicks = outdoors(played(ticks + checks + snaps), reeds_db=-13, shore_db=-19)
    buzzing = outdoors(played([buzz()]), reeds_db=-2, shore_db=-9)
    whistles = [whistle(*row) for row in FAR_WHISTLES]
    far_calls = played(whistles + repeated(PEEPS, count=7) + repeated(WHEEZES, count=4))
    far = outdoors(amp(-1) * far_calls, reeds_db=-9, shore_db=-7)
    crow = outdoors(amp(-1) * played([caw(*row) for row in CAWS]), reeds_db=-9, shore_db=-7)
    return (songs + neighbour + notes + chirps + clicks + buzzing + far + crow + hush())[None]


EDGE_HZ = 15800


def record(dry):
    """The recorder's band limit: a steep low-pass."""
    lowpass = signal.firwin(511, EDGE_HZ, window=("kaiser", 9), fs=SR)
    return signal.oaconvolve(dry, lowpass[None], "same")


dry = scene()
out = record(dry)
generate_wav(out)
```